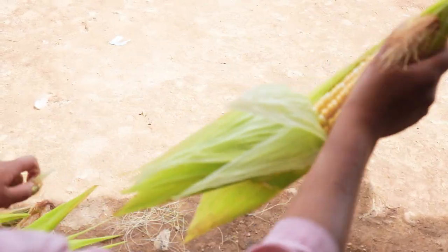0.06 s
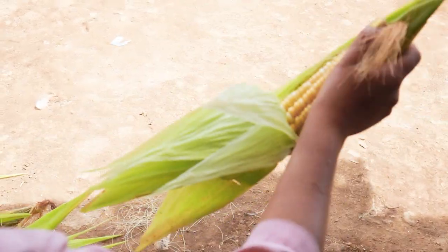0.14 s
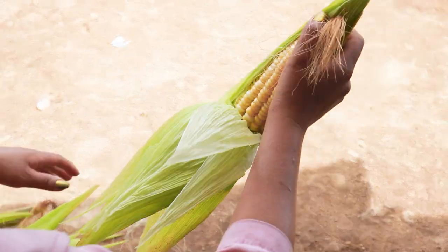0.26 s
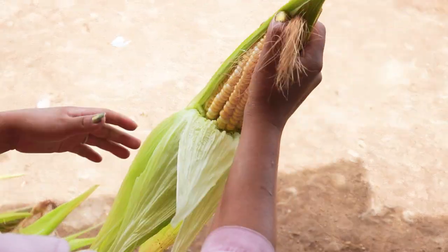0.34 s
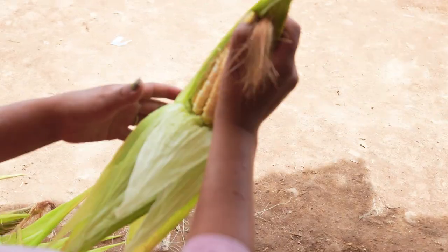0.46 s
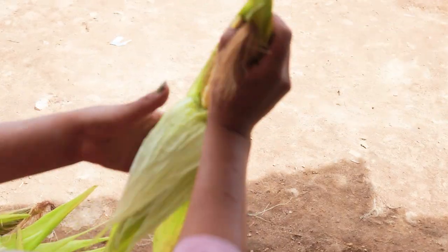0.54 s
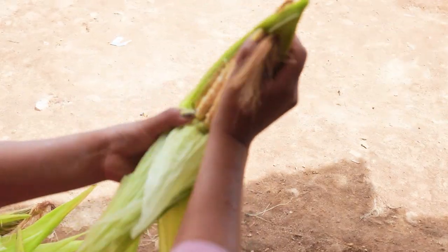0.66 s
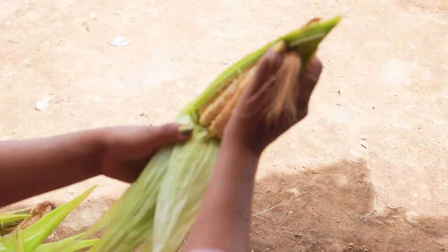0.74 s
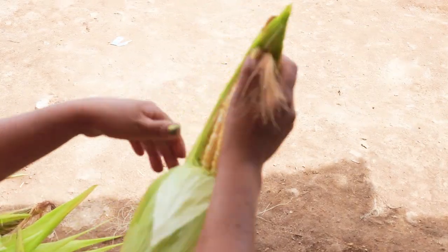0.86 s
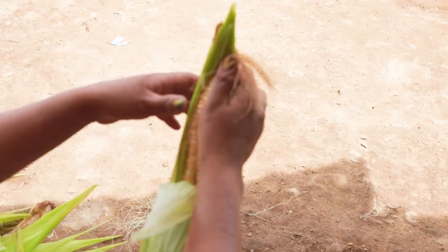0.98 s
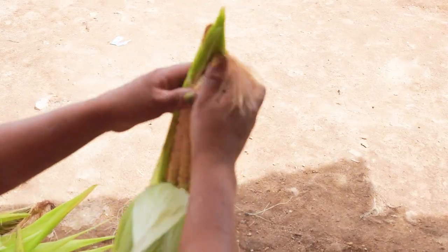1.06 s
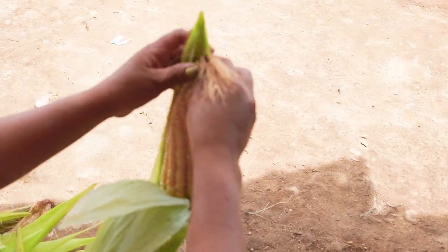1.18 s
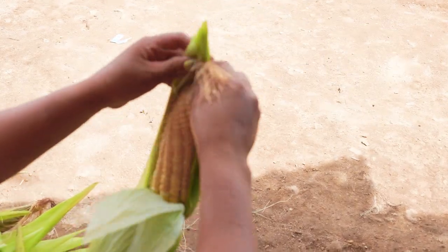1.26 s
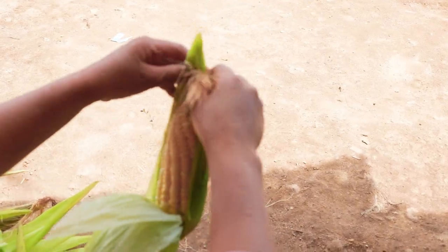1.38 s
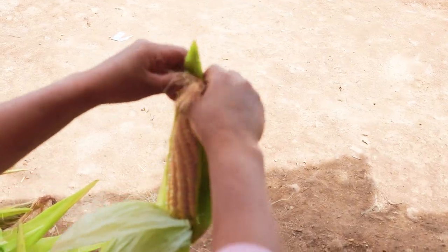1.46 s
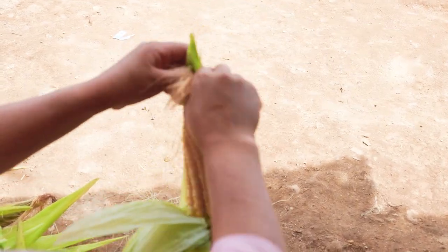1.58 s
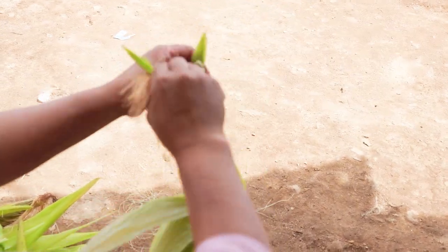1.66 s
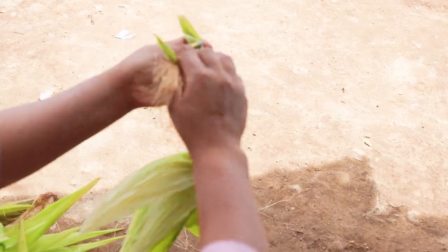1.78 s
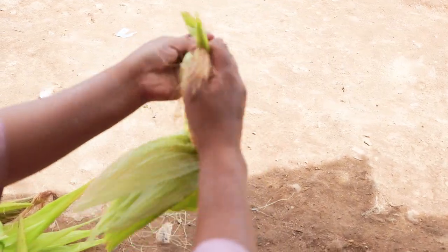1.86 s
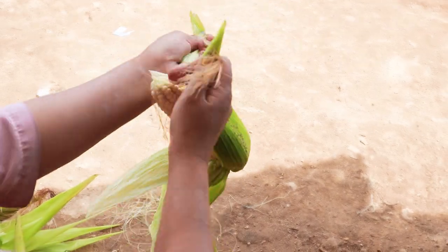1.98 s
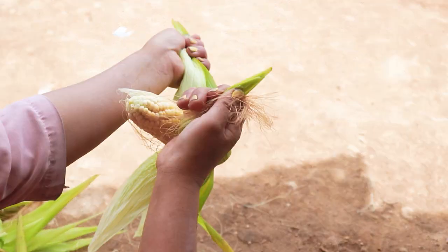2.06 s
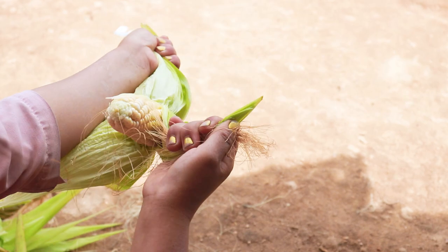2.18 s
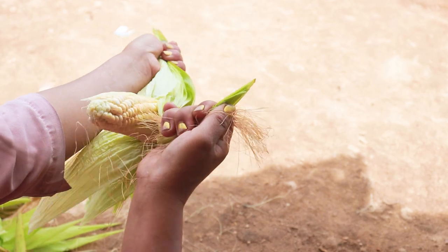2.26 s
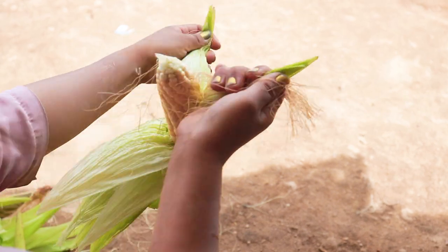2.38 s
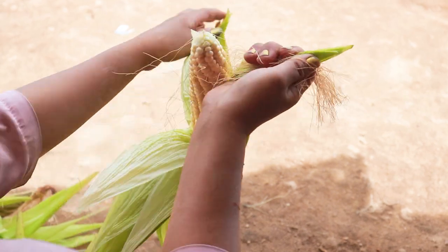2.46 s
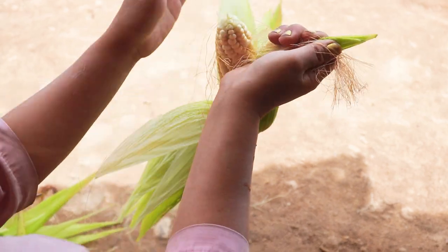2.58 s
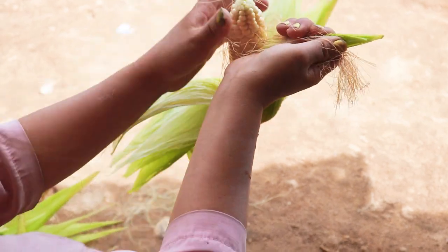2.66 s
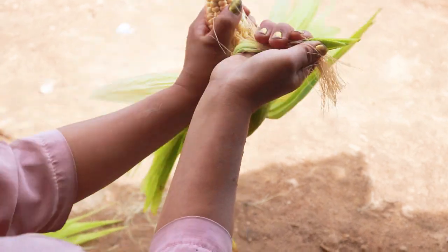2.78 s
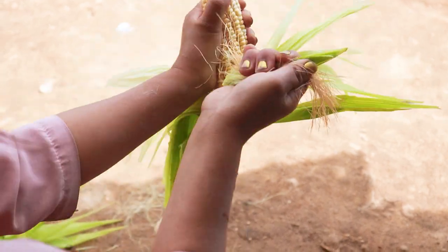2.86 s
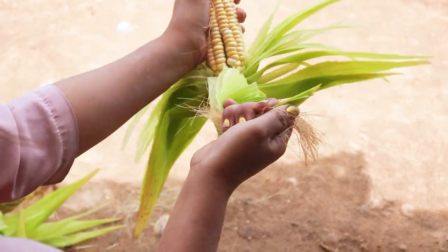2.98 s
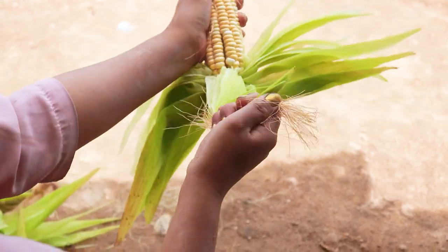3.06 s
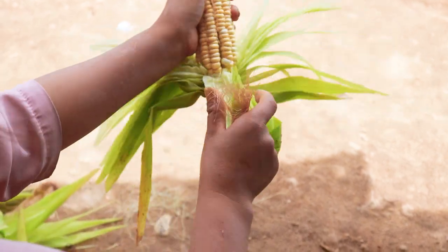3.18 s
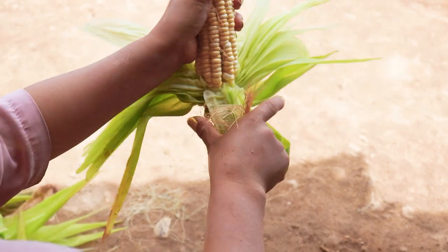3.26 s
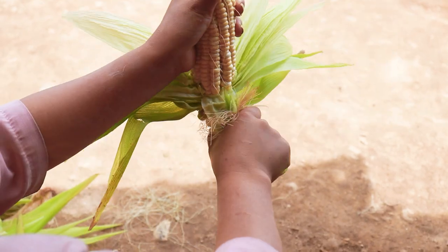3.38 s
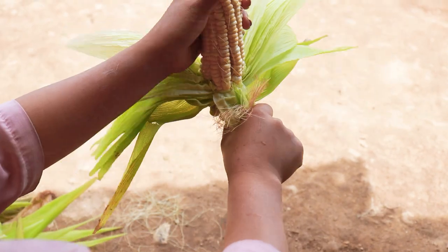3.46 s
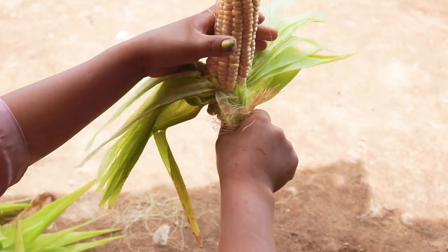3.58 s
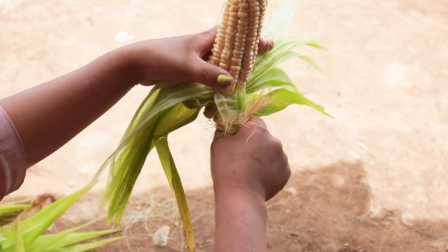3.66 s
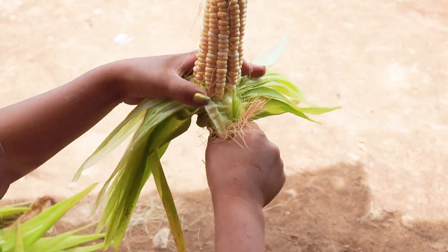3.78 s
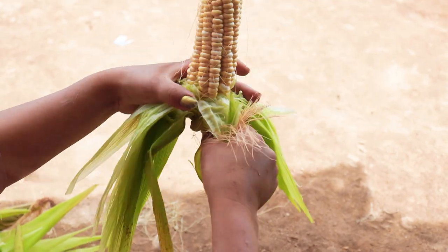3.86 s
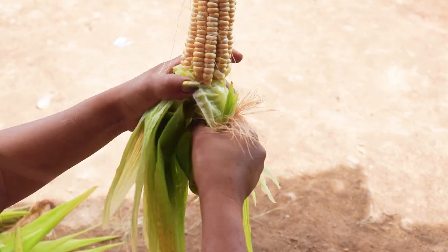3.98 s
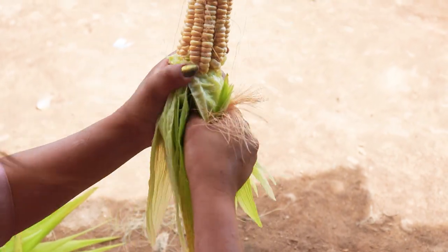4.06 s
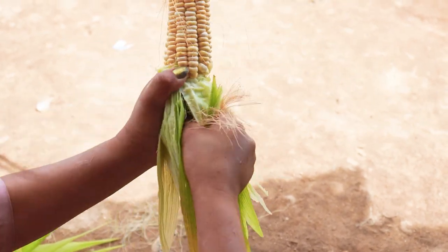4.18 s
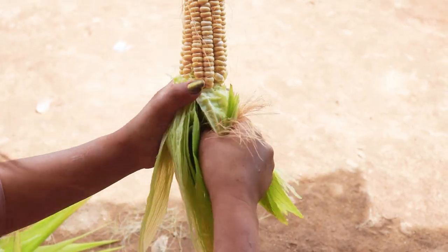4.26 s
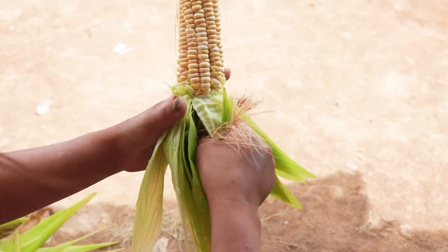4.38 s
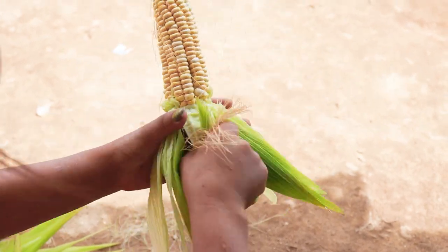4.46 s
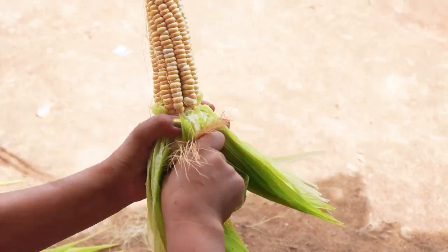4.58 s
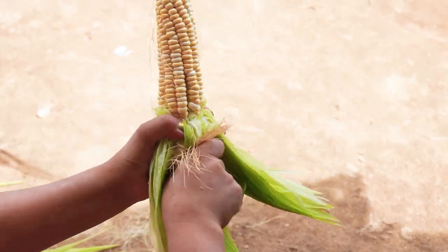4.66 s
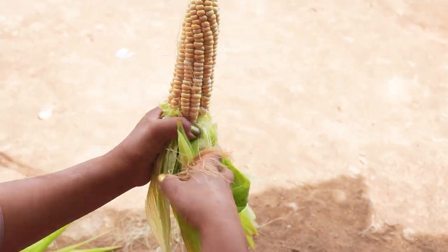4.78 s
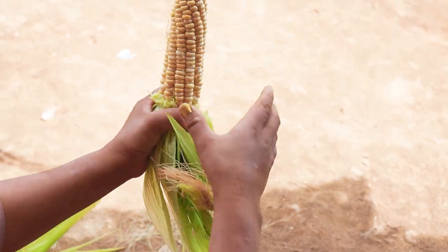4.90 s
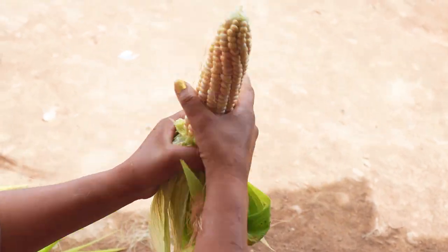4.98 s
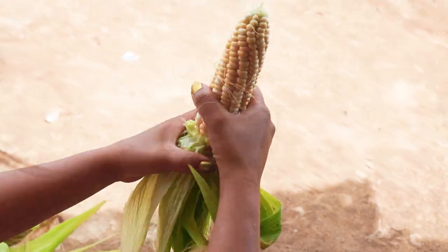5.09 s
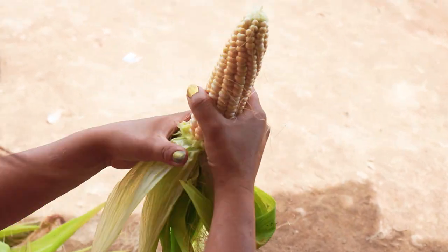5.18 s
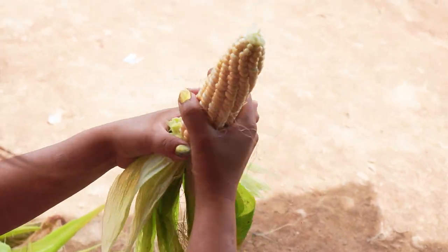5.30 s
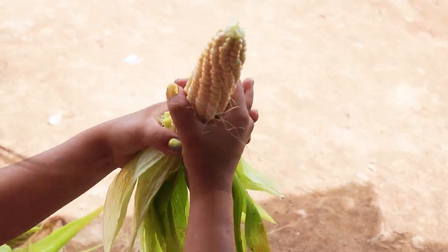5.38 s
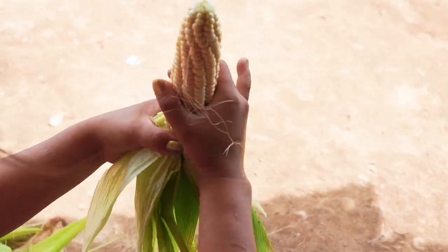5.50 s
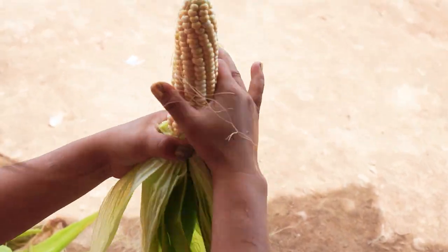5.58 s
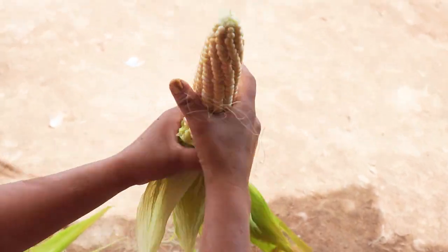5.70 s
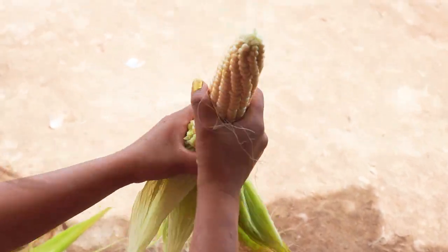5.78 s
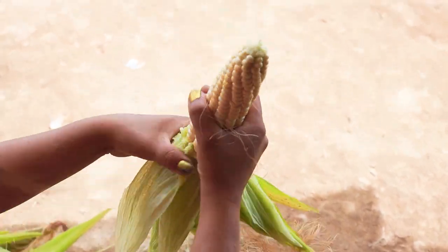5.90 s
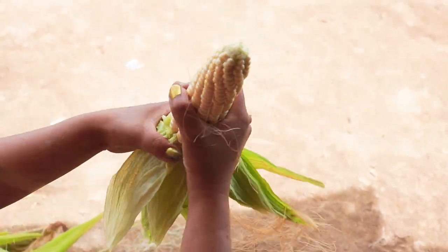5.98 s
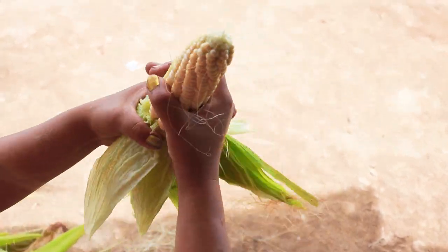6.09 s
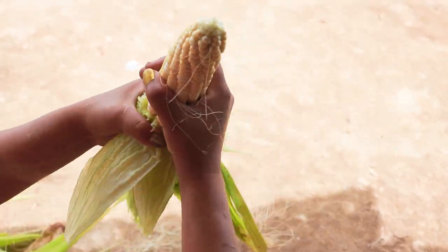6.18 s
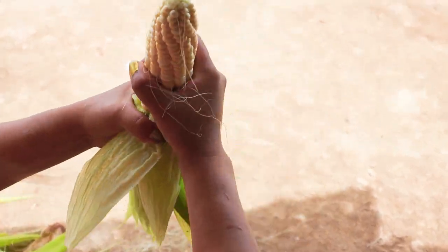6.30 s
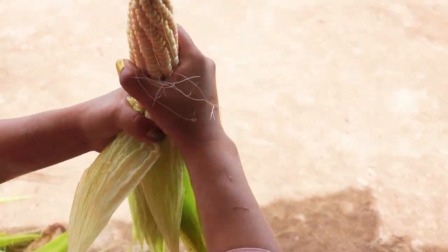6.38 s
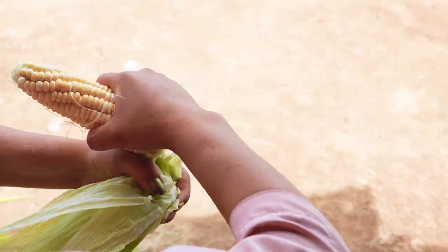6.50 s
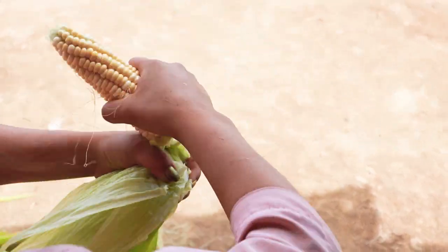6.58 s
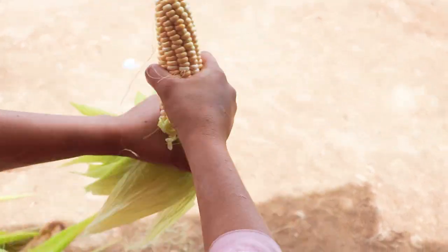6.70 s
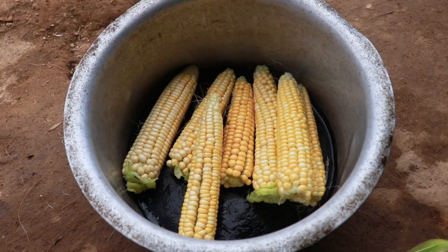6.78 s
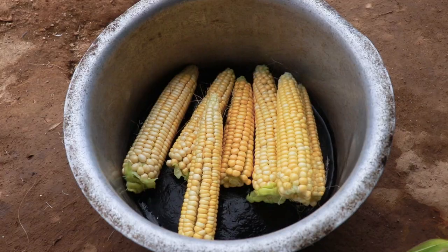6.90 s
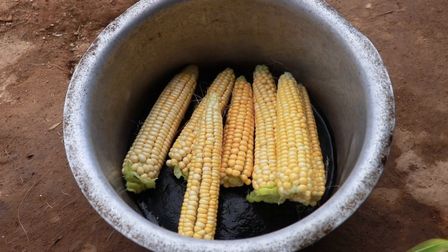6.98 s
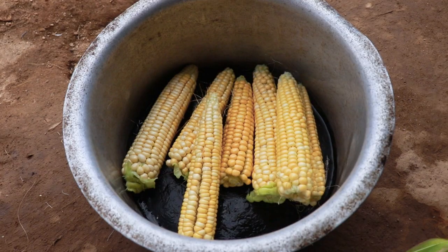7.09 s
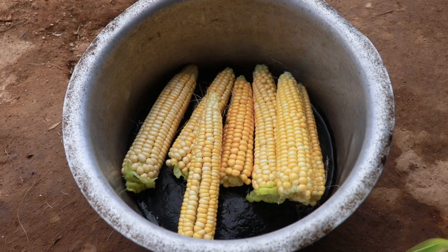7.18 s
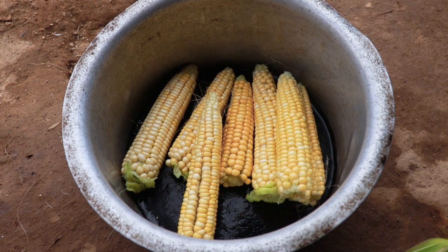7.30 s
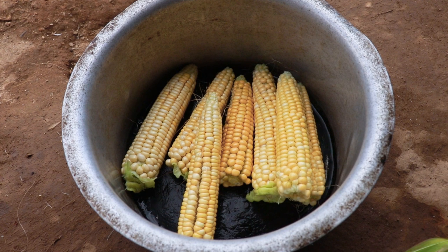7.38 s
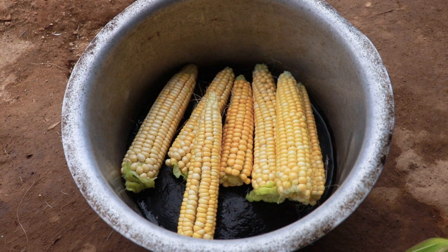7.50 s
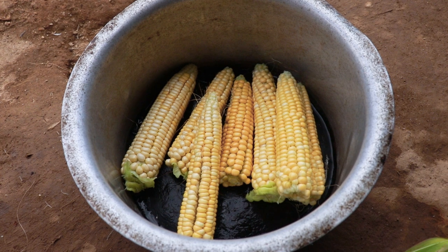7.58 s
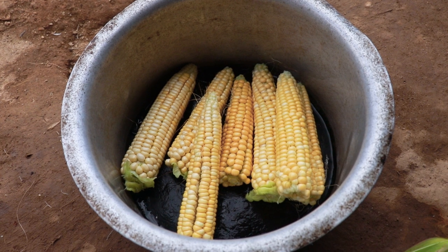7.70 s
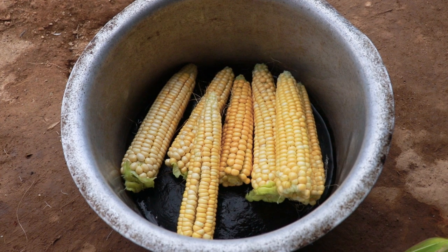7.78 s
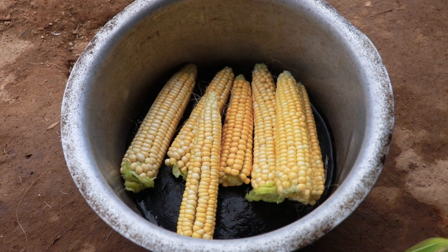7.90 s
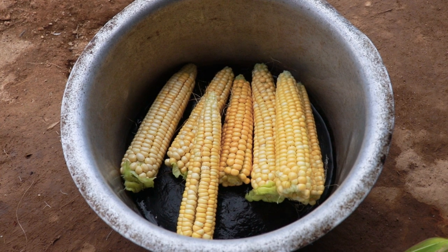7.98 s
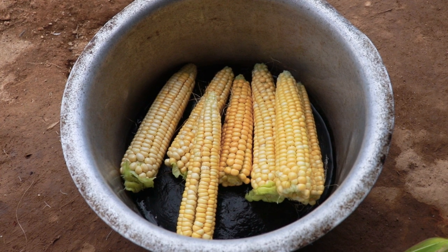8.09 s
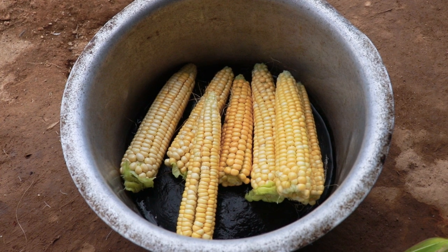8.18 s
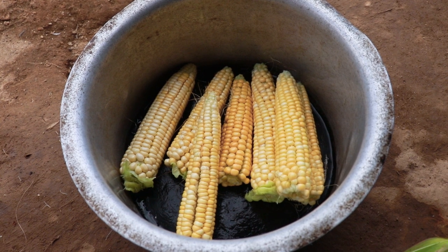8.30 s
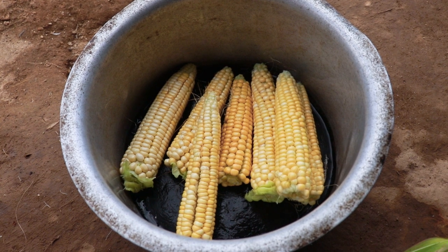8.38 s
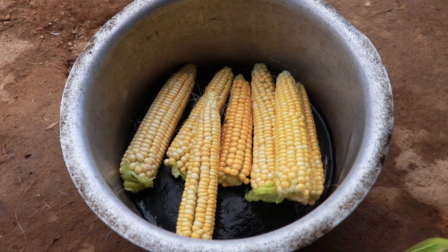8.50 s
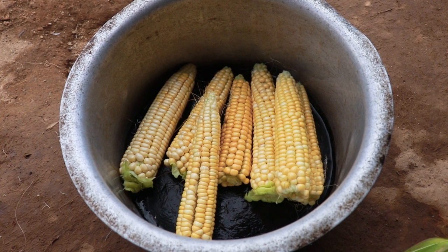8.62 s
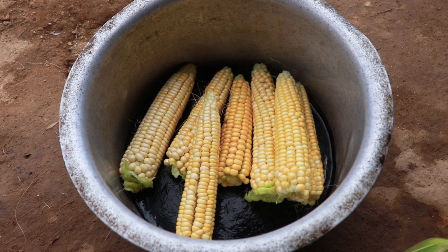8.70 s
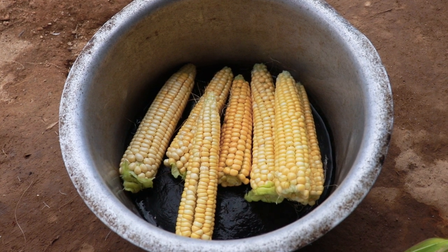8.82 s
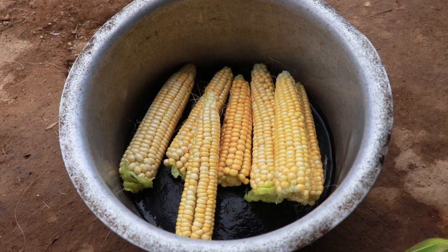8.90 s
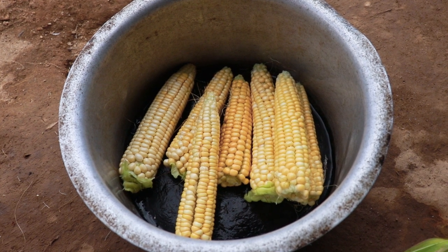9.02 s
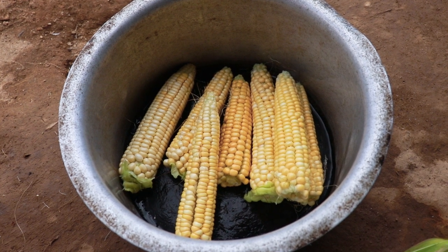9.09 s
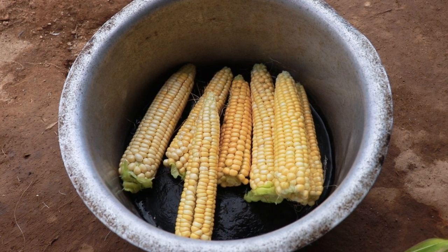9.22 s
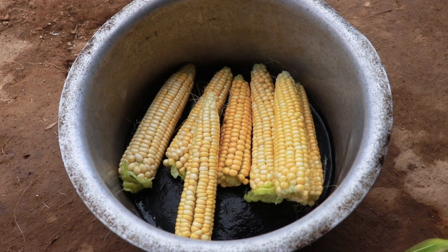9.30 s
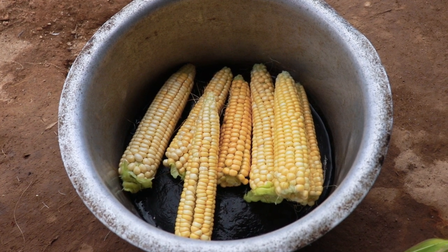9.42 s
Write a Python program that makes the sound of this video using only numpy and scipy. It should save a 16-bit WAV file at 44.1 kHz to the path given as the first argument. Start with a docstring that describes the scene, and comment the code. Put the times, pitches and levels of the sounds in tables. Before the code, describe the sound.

A soft, faint outdoor hush surrounds close hands on a maize ear. From 0 to 1 s, light leaf rubbing brings small ticks and barely audible skin squeaks. At 1.6-1.8 s fibres snap and a leaf peels quickly and brightly, leaning right, with slight low air bumps on the microphone. A fuller ripping rustle with crisp pops comes around 2.1-2.3 s, and a denser tear at 2.9-3.1 s. Scattered snaps continue, with a sharp cluster at 4.1-4.2 s and a tug near 4.9 s. From 5 to 6.4 s there is softer rubbing and small ticks. At 6.52 s the stalk breaks with the loudest crack; at 6.78 s a palm gives a short low squeak. A tiny silence at 6.81 s, then quiet, brighter dry husk rustle and brittle crackles on the left, with isolated ticks at 8.15, 8.6 and 9.0 s, thinning until about 9.4 s. Very short scattered reflections answer the hands.

```python
"""A soft outdoor hush (shaped noise) lies over an open yard. Near the microphone, hands rip and strip green
husks off maize ears: rubbing noise and fibre grains rustle, damped rings and cracks make the snaps, gliding
tones the squeaks. Early on, puffs of air (slow pulses) bump the ports. Later the stalk breaks and a palm squeaks
on the cob; after an edit with a short silence, dry husks crackle off to the left in brighter noise and grains.
Ground and a house wall answer the hands with short scattered noise tails."""
import sys
import numpy as np
from scipy import signal
from scipy.fft import rfft, irfft, next_fast_len
from scipy.io import wavfile
from scipy.ndimage import uniform_filter1d, map_coordinates

SR = 44100
rng = np.random.default_rng(int(sys.argv[2]) if len(sys.argv) > 2 else 0)


def magnitude_from_level(level_db):
    """Linear magnitude for a level in decibels (20 dB per decade)."""
    exponent = np.asarray(level_db, float) / 20
    return 10 ** exponent


def bounce(signal):
    """Save signal as a 16-bit WAV file at the path given by the first command-line argument."""
    frames = np.transpose(np.atleast_2d(signal))
    limited = np.clip(frames, -1, 1)
    pcm = np.round(limited * 32767).astype(np.int16)
    wavfile.write(sys.argv[1], SR, pcm)


N = 416744
T = np.arange(N) / SR  # time in s
TOP_HZ = 15900  # hush, sliding hiss, snaps and wall answer stop here


def unit(x):
    """Scale to rms 1."""
    return x / np.sqrt(np.mean(x ** 2) + 1e-20)


def along(points, hz):
    """Read (Hz, value) points on a log frequency axis."""
    f, v = np.transpose(points)
    return np.interp(np.log(hz + 1), np.log(f + 1), v)


def wobble(rate):
    """A smooth random curve with rate knots a second."""
    knots = rng.standard_normal(int(N * rate / SR) + 4)
    return map_coordinates(knots, [np.arange(N) * rate / SR])


def filtered(x, response):
    """Multiply the spectrum of x by a response of frequency."""
    m = next_fast_len(N + 8192)
    return irfft(rfft(x, m) * response(np.fft.rfftfreq(m, 1 / SR)), m)[..., :N]


def pair(shape, alike):
    """Left and right noise, only partly the same: a leaf is wide and sounds from many points."""
    a, b = rng.standard_normal((2, *shape))
    turn = np.arccos(np.clip(alike, 0, 1)) / 2
    mid, side = np.cos(turn) * a, np.sin(turn) * b
    return np.array([mid + side, mid - side])


# Silence at the edit; green husks before it, dry husks after it: [start_s, end_s]
EDIT_SPAN = (6.808, 6.843)


def edit_gate():
    """Gain that ramps down into the silence of the edit and up out of it."""
    outside_s = np.maximum(EDIT_SPAN[0] - T, T - EDIT_SPAN[1])
    return np.clip(outside_s / 0.0033, 0, 1)


# Colour of the far yard air: [pitch_hz, level_db per Hz, before scaling]
HUSH_COLOUR = [(15, -41), (25, -7.5), (200, -3), (394, -5.5), (1190, -11), (2110, -16), (16000, -28)]
# Likeness of the hush at the two ports: [pitch_hz, left_right_likeness]
HUSH_LIKENESS = [(60, 1), (1650, 0.018)]


def hush():
    """Far yard air, alike in the bass at both ports and almost unrelated in the treble."""
    def mid_and_side(hz):
        turn = np.arccos(np.clip(along(HUSH_LIKENESS, hz), -1, 1)) / 2
        return magnitude_from_level(along(HUSH_COLOUR, hz)) * (hz < TOP_HZ) * [np.cos(turn), np.sin(turn)]

    mid, side = filtered(rng.standard_normal((2, N)), mid_and_side)
    return magnitude_from_level(-61) * unit(np.array([mid + side, mid - side]))  # rms in dB


# Air on the microphone ports: [centre_s, level_db before the port gains, pitch_hz]
AIR_PUFFS = [ (1.611, -42.5, 57.3), (1.819, -42.5, 140), (1.84, -46, 59.6)]


def puffs():
    """Short low pushes of air on the microphone, stronger on the left port."""
    push = np.zeros(N)
    for centre_s, level_db, hz in AIR_PUFFS:
        t = T - centre_s
        push += magnitude_from_level(level_db) * np.cos(2 * np.pi * hz * t) * np.exp(-(t * hz / 0.5) ** 2)
    return push * magnitude_from_level(np.array([[3], [-4]]))


# Dying of the answer from ground and house wall: [pitch_hz, t60_s]
WALL_DECAY = [(300, 0.01216), (2000, 0.13), (12000, 0.2)]


def wall(x):
    """Scattered short answers from ground and wall, different at each port."""
    hz, t, z = signal.stft(rng.standard_normal((2, SR // 8)), SR, nperseg=128)
    decay = magnitude_from_level(-60 * t / along(WALL_DECAY, hz)[:, None])
    tail = signal.istft(z * decay, SR, nperseg=128)[1]
    return signal.fftconvolve(x, tail / np.linalg.norm(tail[0]), axes=1)[:, :N]


# Where the hands work: [time_s, left_over_right_db]
HAND_PLACE = [(0, -0.5), (1.7, -5.5), (1.9, -1), (6.82, -3), (6.84, 4.5)]


def placed(x):
    """Level difference between the ports and, after the edit, a later arrival at the right one."""
    pan_db = np.interp(T, *np.transpose(HAND_PLACE))
    lag = 9  # samples
    right = np.where(T > EDIT_SPAN[1], np.roll(x[1], lag), x[1])
    return np.array([magnitude_from_level(pan_db / 2) * x[0], magnitude_from_level(-pan_db / 2) * right])


# Skin on leaf or cob: [start_s, end_s, settled pitch_hz, level_db before flutter]
SKIN_SQUEAKS = [(0.72, 0.746, 2290, -53), (0.918, 0.965, 640, -59), (5.97, 5.993, 1200, -58),
                (6.7745, 6.808, 313, -32.5)]


def squeaks():
    """Skin slips at a steady rate: short hums that settle in pitch, the high ones wavering."""
    fall_hz, settle_s = 45, 0.0064  # a squeak starts this much higher and settles
    flutter_db = 2.2  # per octave over the lowest squeak, times a random curve
    out = np.zeros(N)
    lowest_hz = min(row[2] for row in SKIN_SQUEAKS)
    for start_s, end_s, hz, level_db in SKIN_SQUEAKS:
        t = T - start_s
        octaves_up = np.log2(hz / lowest_hz)
        glide = fall_hz * settle_s * np.exp(-np.maximum(t, 0) / settle_s)
        phase = 2 * np.pi * (hz * t - glide) + 0.5 * octaves_up * wobble(90)
        gain = magnitude_from_level(level_db + flutter_db * octaves_up * wobble(90))
        out += gain * np.sin(phase) * np.clip(t / 0.0019, 0, 1) * (t < end_s - start_s)
    return out


# Hand strokes along the leaves: [peak_s, rustle level_db, rise_s, fall_s]
HAND_STROKES = [(0.293, -56.5, 0.039, 0.053), (.636, -53, 0.02, 0.053), (0.734, -49, 0.058, 0.048),
                (.848, -54.5, 0.022, 0.087), (.94, -54.5, 0.062, 0.047), (1.665, -52, 0.06, 0.041),
                (1.712, -38, 0.022, 0.068), (1.77, -37, 0.028, 0.028), (2.11, -41, .13, 0.13),
                (2.2, -40, 0.15, 0.095), (2.4, -49, 0.021, 0.018), (2.54, -55.5, 0.15, 0.059),
                (2.98, -40, 0.11, 0.082), (3.054, -42.5, 0.049, 0.053), (3.779, -46, 0.047, 0.055),
                (4.07, -50, 0.096, 0.071), (4.189, -48, 0.23, 0.053), (4.345, -53, 0.039, 0.091),
                (4.891, -43, .12, 0.044), (4.985, -49, 0.12, 0.07), (5.38, -50.5, 0.13, 0.1),
                (5.65, -51, 0.16, 0.084), (5.96, -52, 0.061, 0.14), (6.548, -38.5, 0.032, 0.061),
                (6.774, -37.5, 0.015, 0.037), (7.28, -56, 0.14, 0.094), (7.427, -53.5, 0.065, 0.095),
                (7.78, -53.5, 0.055, 0.069), (8.88, -56.5, 0.031, 0.049)]
# Leaves shifting in the grip: [time_s, rustle level_db]
GRIP = [(0, -69), (1.6, -65.5), (3.2, -58), (4.4, -63.5), (5.2, -61.5), (6.4, -61.5), (6.7, -75.5),
        (9.45, -87)]


def pull():
    """Rustle level in dB: strokes, leaf shaking after each snap and the grip add as powers."""
    edge_db, roundness = 18, 2  # loss one rise or fall from the peak; exponent, 1 = pointed
    power = magnitude_from_level(2 * np.interp(T, *np.transpose(GRIP)))
    for peak_s, level_db, rise_s, fall_s in HAND_STROKES:
        near = slice(max(round((peak_s - 3 * rise_s) * SR), 0), round((peak_s + 3 * fall_s) * SR))
        away = np.abs(T[near] - peak_s) / np.where(T[near] < peak_s, rise_s, fall_s)
        power[near] += magnitude_from_level(2 * (level_db - edge_db * away ** roundness))
    for start_s, level_db, hz in FIBRE_SNAPS:
        after = power[round(start_s * SR):][:SR // 5]
        # the shaking starts 22 dB under the snap, lower still for rings under 1500 Hz
        shake_db = level_db - 22 + 13.9 * min(np.log2(hz / 1500), 0)
        after += magnitude_from_level(2 * (shake_db - 798.5 * T[:len(after)]))  # dies at 798.5 dB per s
    return 10 * np.log10(power)


def slips(per_s, life_s):
    """Stick and slip: the sliding jumps up suddenly at random moments and dies away."""
    jumps = (rng.random(N) < per_s / SR) * rng.random(N)
    return signal.lfilter([1], [1, -np.exp(-1 / (life_s * SR))], jumps)


def patchy(x, depth_db):
    """Random patches of gain in time and pitch: each fold of leaf rubs with its own colour."""
    z = signal.stft(x, nperseg=256)[2]
    field = uniform_filter1d(rng.standard_normal(z.shape[1:]), size=7, axis=0)
    field = uniform_filter1d(field, size=12, axis=1)
    return signal.istft(z * magnitude_from_level(depth_db * unit(field)), nperseg=256)[1][:, :N]


# Green husk, then dry husk: [middle grain pitch_hz, grains_per_s before variation, hiss level_db]
HUSK_KINDS = [(2380, 900, 2), (6200, 650, -4)]
EVEN_DB = -36.5  # pull that adds neither grains nor treble


def grains(dry, pull_db, spread_db, octaves, cycles):
    """Tiny fibre breaks, each a damped wavelet of its own pitch, size and place, levelled locally."""
    (green_hz, green_rate, _), (dry_hz, dry_rate, _) = HUSK_KINDS
    # harder pulls break more fibres: 0.3 dB of rate per dB of pull
    crowding = magnitude_from_level(3 * wobble(30) + 0.3 * (pull_db - EVEN_DB))
    at = np.flatnonzero(rng.random(N) < np.where(dry, dry_rate, green_rate) * crowding / SR)
    pitch, side, skew = rng.standard_normal((len(at), 3)).T[:, :, None]
    size = magnitude_from_level(spread_db * np.minimum(rng.exponential(size=(len(at), 1)), 4))
    centre_hz = np.where(dry, dry_hz, green_hz) * 2 ** (0.23 * wobble(8.7))
    hz = np.clip(centre_hz[at, None] * 2 ** (octaves * pitch), 950, 14000)
    k = np.arange(160)  # samples in a grain
    turn = 2 * np.pi * hz * k / SR
    wavelet = size * np.exp(-turn / (2 * np.pi * cycles)) * np.sin(turn)
    where = (at[:, None] + k).ravel()
    out = []
    for ear in (1, -1):
        heard = wavelet * magnitude_from_level(ear * 0.76 * side) * np.cos(ear * 0.5 * skew + turn / 7)
        out.append(np.bincount(where, heard.ravel(), N + len(k))[:N])
    local_power = uniform_filter1d(np.mean(np.square(out), 0), SR // 12)
    return out / np.sqrt(np.abs(local_power) + 0.019)


# Colour of sliding green leaf: [pitch_hz, level_db per Hz, before scaling]
GREEN_COLOUR = [(300, -35.5), (600, -4), (850, -16.5), (1300, -5), (2200, -1.5), (5000, -8), (9760, -13.5),
                (16000, -29.5)]
# Colour of sliding dry husk: [pitch_hz, level_db per Hz, before scaling]
DRY_COLOUR = [(800, -26.5), (2000, 5), (4500, -1.5), (8500, -2), (12500, -14.5)]
# One leaf peels off evenly, without jerks or grains, and brighter: [start_s, end_s, extra treble_db]
EVEN_PEEL = (1.703, 1.765, 7)


def rustle(pull_db):
    """Fibre grains over the hiss of leaf sliding on leaf, which jerks now and then."""
    dry = T > EDIT_SPAN[1]
    even = (T > EVEN_PEEL[0]) & (T < EVEN_PEEL[1])
    jerks = 0.68 + 1.9 * slips(per_s=110, life_s=0.0017) * ~even
    rub = patchy(pair((N,), 0.54), depth_db=3.5)
    green_hiss, dry_hiss = (
        magnitude_from_level(kind[2]) * unit(filtered(rub, lambda hz: magnitude_from_level(along(colour, hz)) * (hz < TOP_HZ)))
        for kind, colour in zip(HUSK_KINDS, (GREEN_COLOUR, DRY_COLOUR)))
    hiss = jerks * np.where(dry, dry_hiss, green_hiss)
    crackle = grains(dry, pull_db, spread_db=4.0, octaves=0.577, cycles=1.8)
    leaf = hiss + 0.48 * ~even * crackle
    treble = filtered(leaf, lambda hz: 1 / (1 + (5000 / (hz + 1)) ** 2))
    # harder pulls on green leaf are brighter: 0.31 dB of treble per dB of pull
    boost = magnitude_from_level(0.31 * (pull_db - EVEN_DB) * ~dry + EVEN_PEEL[2] * even)
    return magnitude_from_level(pull_db) * (leaf + (boost - 1) * treble)


# Fibres that snap: [start_s, peak level_db before filters and placing, ring pitch_hz]
FIBRE_SNAPS = [(0.744, -29, 1940), (0.782, -40, 2600), (0.845, -34, 1990), (0.884, -35, 2180),
               (1.629, -31, 3000), (1.6319, -21.5, 2223), (1.6928, -32, 3224), (1.6996, -22, 3030),
               (1.776, -20, 2070), (1.792, -27, 5500), (2.1461, -24.5, 1610), (2.1795, -21.5, 2079),
               (2.193, -23, 2182), (2.207, -18.5, 4210), (2.2173, -15.5, 2010), (2.247, -12, 3355),
               (2.2542, -19.5, 2460), (2.815, -40, 2700), (2.907, -26.5, 2547), (2.941, -16.5, 2048),
               (2.9617, -12.5, 2380), (2.9786, -13, 2716), (2.9834, -15.5, 2230), (3.015, -23, 2397),
               (3.0338, -16, 2670), (3.0417, -9.5, 5880), (3.0614, -15.5, 2916), (3.076, -20, 4600),
               (3.116, -29, 4200), (3.15, -39, 3507), (3.1602, -25.5, 4890), (3.252, -32.5, 811),
               (3.306, -35.5, 2600), (3.346, -31, 2286), (3.392, -28, 2948), (3.4103, -20, 2320),
               (3.585, -22, 2715), (3.6424, -33, 913), (3.6752, -30, 2318), (3.8101, -26, 3920),
               (3.9807, -28, 3944), (4.0876, -10.5, 5100), (4.0972, -15, 1840), (4.108, -15.5, 3650),
               (4.1874, -16, 1940), (4.243, -35, 1923), (4.5405, -33.5, 2380), (4.6394, -29, 3764),
               (4.6714, -31.5, 2760), (4.703, -33.5, 1775), (4.7596, -33, 1804), (4.78, -36, 6000),
               (4.877, -19, 1762), (4.902, -25.5, 2723), (4.946, -23.5, 2893), (5.0525, -31, 3180),
               (5.1211, -30.5, 1893), (5.152, -34, 1580), (5.392, -27, 2608), (5.679, -32, 2096),
               (6.105, -33.5, 2380), (6.15, -35, 2587), (6.258, -36.5, 4450), (6.397, -27.5, 1770),
               (6.444, -30.5, 2123), (6.459, -29.5, 4204), (6.4832, -27.5, 1410), (6.521, -3.5, 1585),
               (6.528, -11, 1310), (6.5402, -10.5, 5240), (6.5595, -14.5, 3070), (6.7239, -27.5, 2380),
               (6.7312, -21, 2850), (6.803, -17.5, 2850), (7.2697, -38.5, 4645), (7.5887, -33.5, 7290),
               (7.6411, -30.5, 6460), (7.7603, -36.5, 4810), (7.7843, -44, 5670), (7.7971, -41.5, 7020),
               (7.8828, -36.5, 5610), (7.9088, -35.5, 6760), (7.922, -34.5, 8120), (8.1184, -27.5, 5430),
               (8.154, -23.5, 5200), (8.1913, -34.5, 2480), (8.598, -20.5, 2910), (8.662, -37.5, 1794),
               (9.002, -22.5, 4294), (9.368, -31, 664)]


def snaps():
    """Each snap: a few cycles of leaf ring, a sharp crack that grows with pitch, a short ragged tail."""
    out = np.zeros((2, N + SR))
    t = np.arange(SR // 25) / SR
    bright = signal.butter(2, [3500, 12000], "band", fs=SR)
    for start_s, level_db, hz in FIBRE_SNAPS:
        noise = pair((3, len(t)), 0.32)
        phase = 2 * np.pi * hz * t + 0.013 * np.cumsum(noise[:, 0], axis=1)
        ring = np.sin(phase) * np.exp(-t * hz / 1.07)
        ring = signal.lfilter(*signal.butter(1, hz / 2, "high", fs=SR), ring)
        band = signal.butter(2, [hz / 1.93, min(hz * 1.59, 15000)], "band", fs=SR)
        tail = unit(signal.lfilter(*band, noise[:, 1])) * magnitude_from_level(-12.0 - 60 * t / 0.018)
        crack_db = -13 + 6 * np.log2(hz / 2500) + 4 * min(np.log2(hz / 1500), 0)
        crack = unit(signal.lfilter(*bright, noise[:, 2])) * magnitude_from_level(-60 * t / 0.00449)
        onset = 1 - np.exp(-t / 0.00022)
        snap = (ring + tail + magnitude_from_level(crack_db) * crack) * onset
        out[:, round(start_s * SR):][:, :len(t)] += magnitude_from_level(level_db) * snap / np.abs(snap).max()
    return out[:, :N]


def scene():
    """Hands near the microphone, before and after the edit, in the yard."""
    fibres = filtered(snaps(), lambda hz: hz < TOP_HZ)
    # thin leaves radiate no bass
    no_bass = signal.butter(2, 480, "high", fs=SR, output="sos")
    leaves = signal.sosfilt(no_bass, rustle(pull()) + fibres)
    hands = placed(leaves) + squeaks()
    answer = magnitude_from_level(-12) * filtered(wall(hands), lambda hz: hz < TOP_HZ)
    return hands + answer + hush() + puffs()


def band_limit(x):
    """A steep low-pass at the top of the band."""
    return signal.sosfilt(signal.butter(12, 16830, fs=SR, output="sos"), x)


def record(dry):
    """The edit leaves a short silence in what the microphone hears."""
    mix = dry * edit_gate()
    return band_limit(mix)


dry = scene()
out = record(dry)
bounce(out)
```